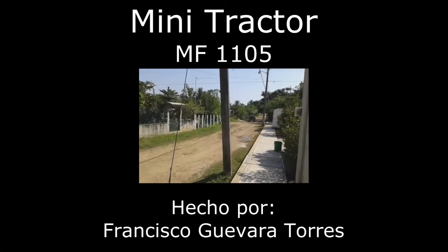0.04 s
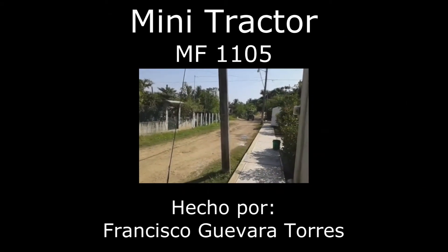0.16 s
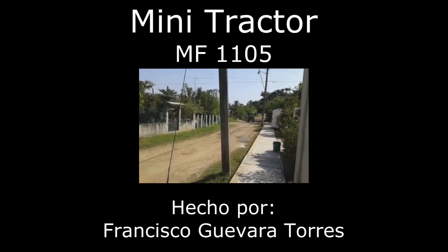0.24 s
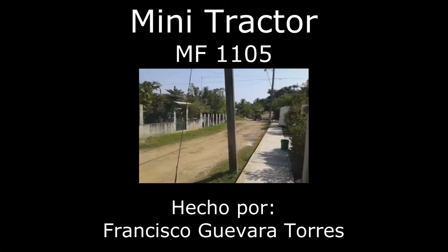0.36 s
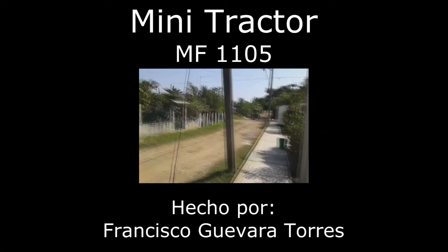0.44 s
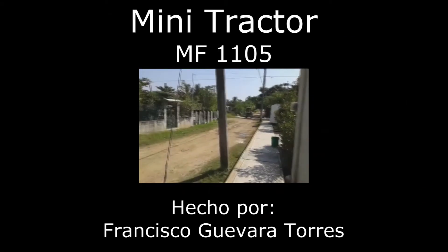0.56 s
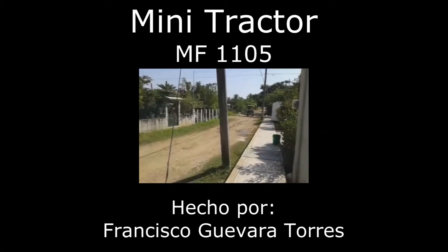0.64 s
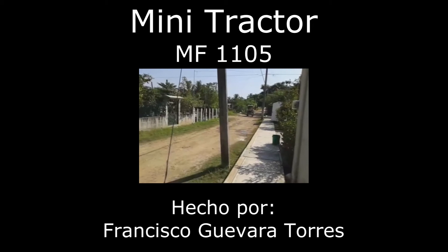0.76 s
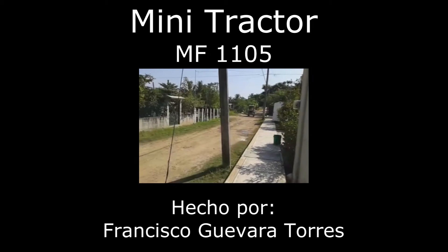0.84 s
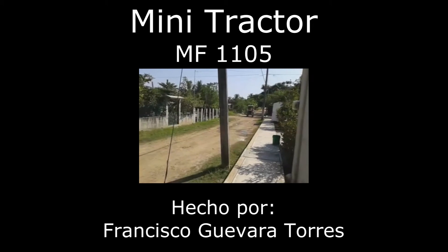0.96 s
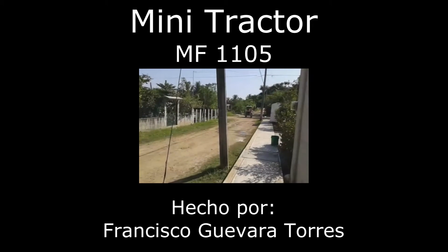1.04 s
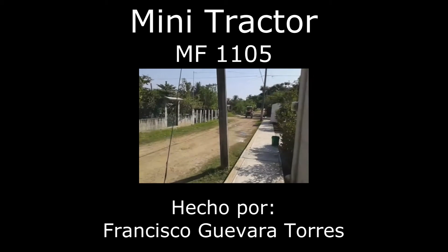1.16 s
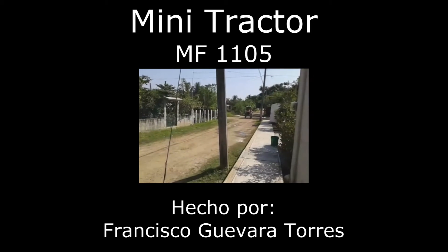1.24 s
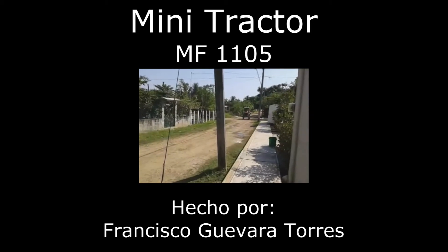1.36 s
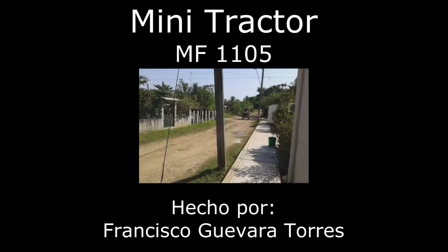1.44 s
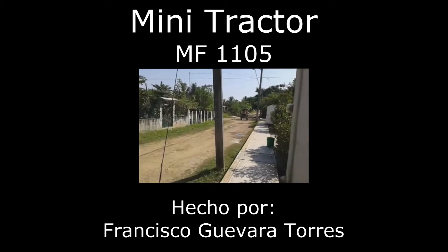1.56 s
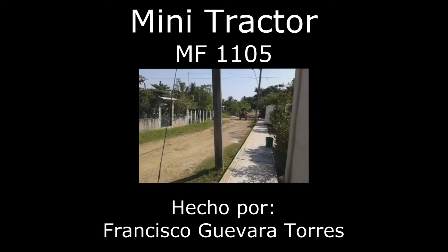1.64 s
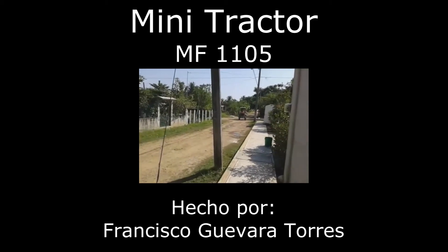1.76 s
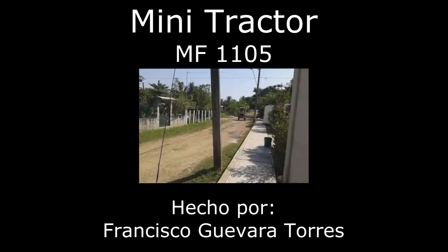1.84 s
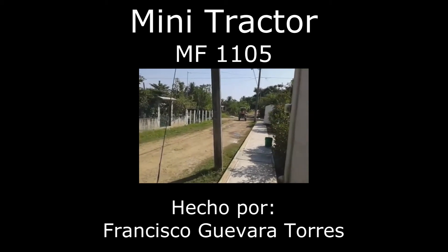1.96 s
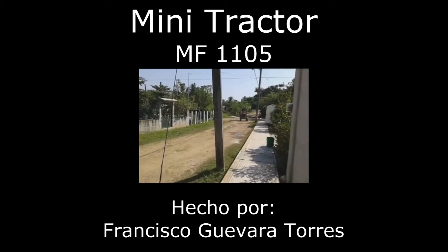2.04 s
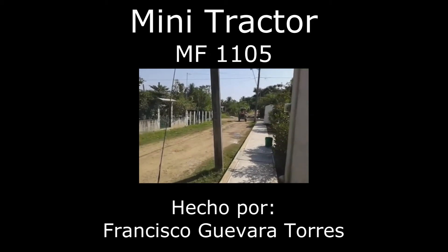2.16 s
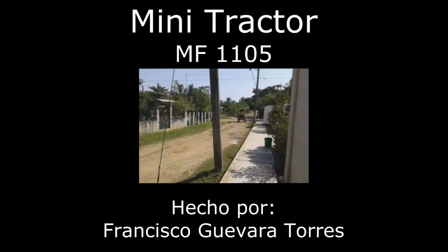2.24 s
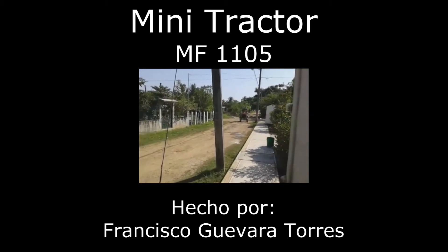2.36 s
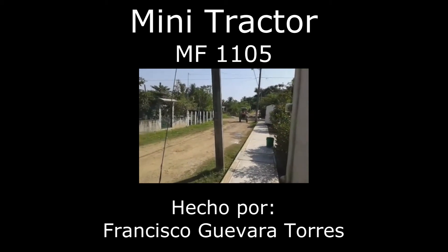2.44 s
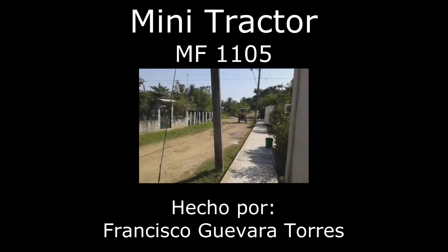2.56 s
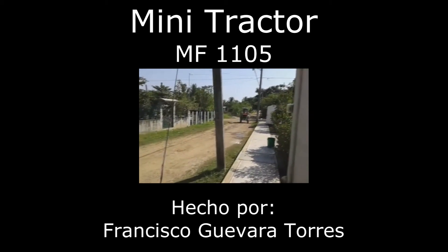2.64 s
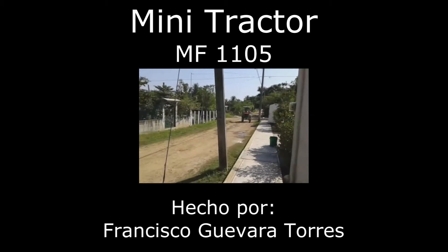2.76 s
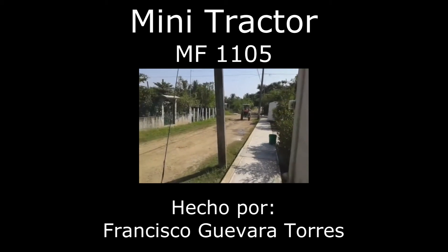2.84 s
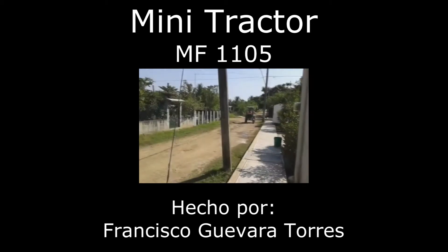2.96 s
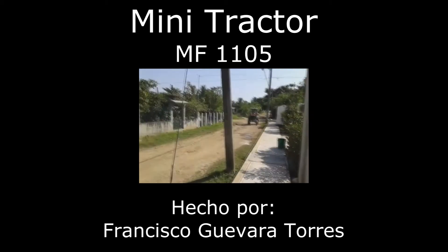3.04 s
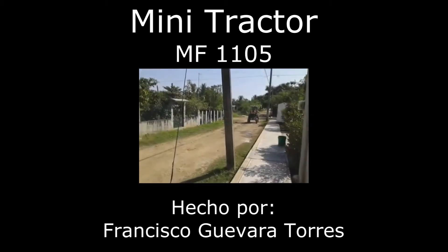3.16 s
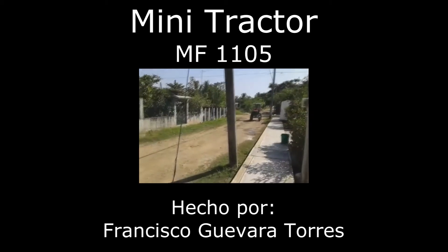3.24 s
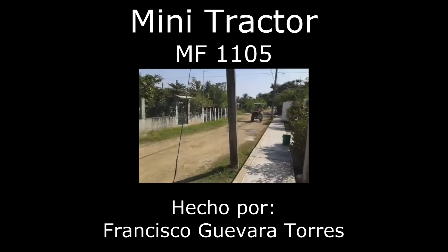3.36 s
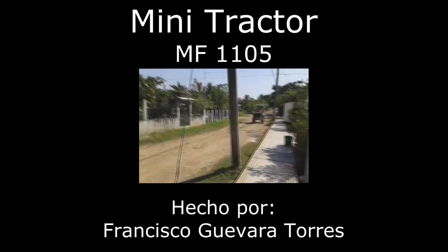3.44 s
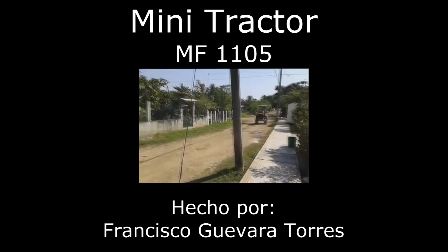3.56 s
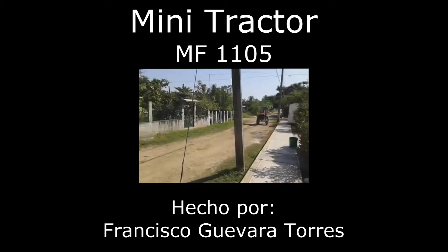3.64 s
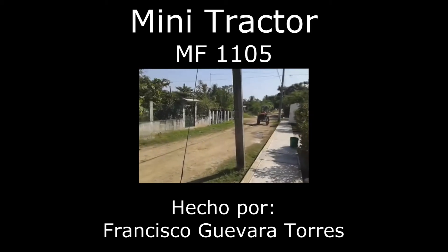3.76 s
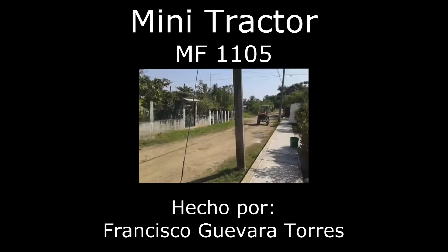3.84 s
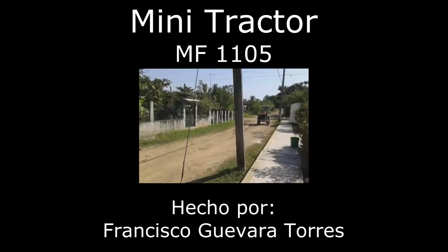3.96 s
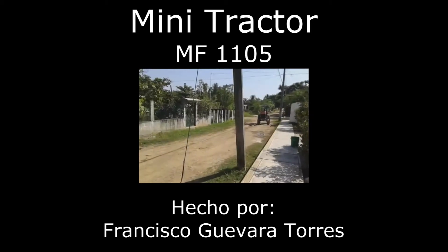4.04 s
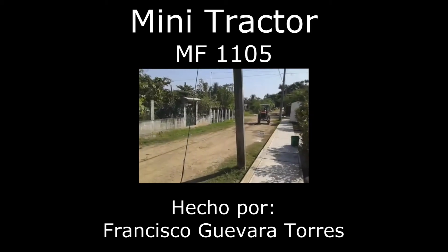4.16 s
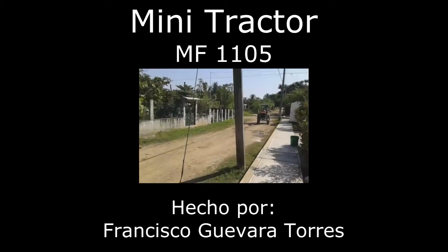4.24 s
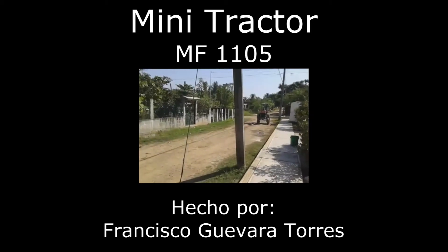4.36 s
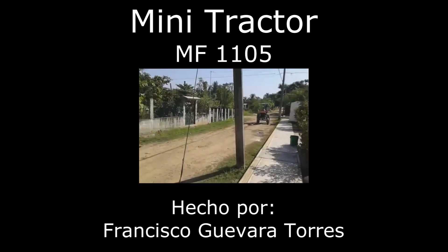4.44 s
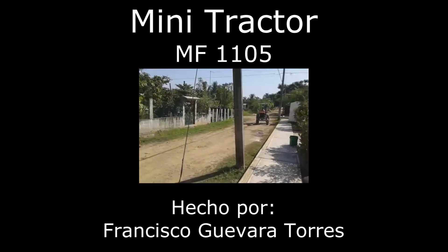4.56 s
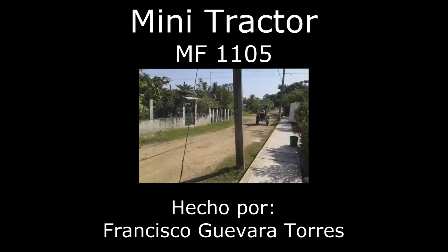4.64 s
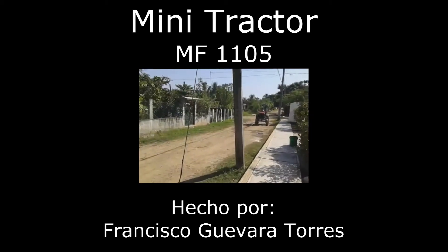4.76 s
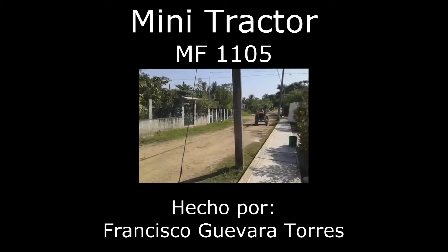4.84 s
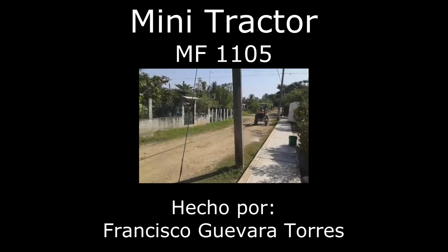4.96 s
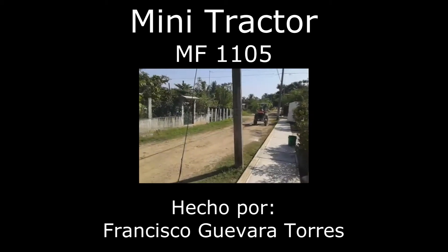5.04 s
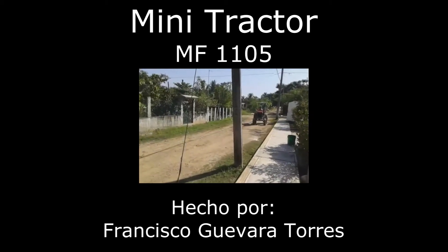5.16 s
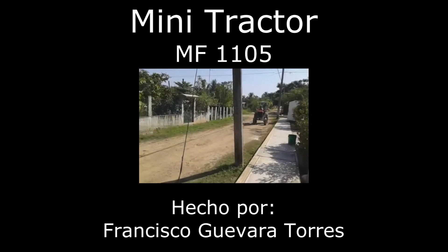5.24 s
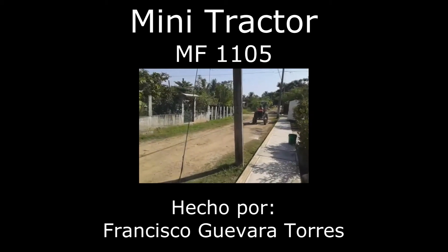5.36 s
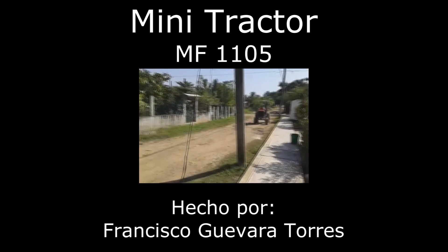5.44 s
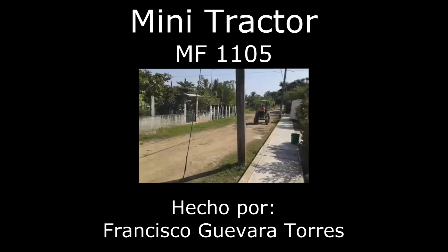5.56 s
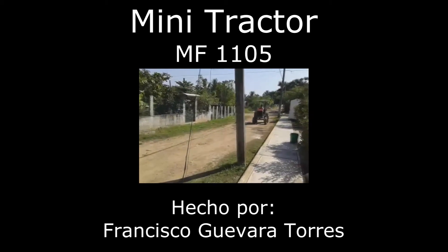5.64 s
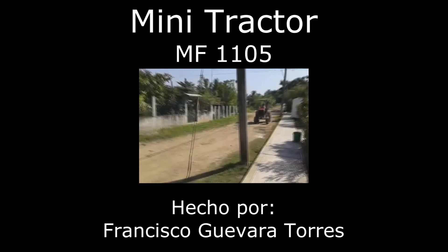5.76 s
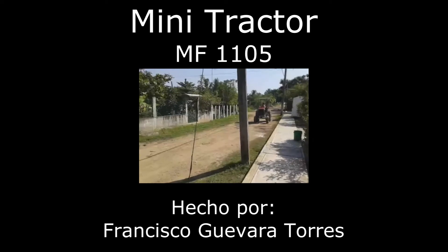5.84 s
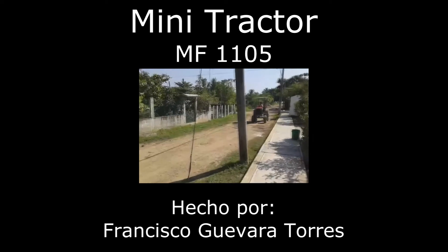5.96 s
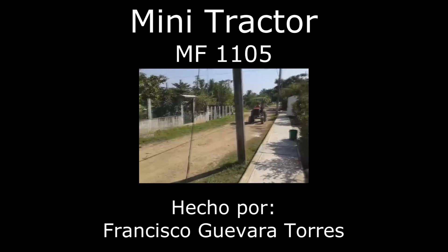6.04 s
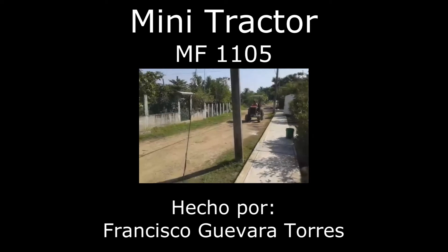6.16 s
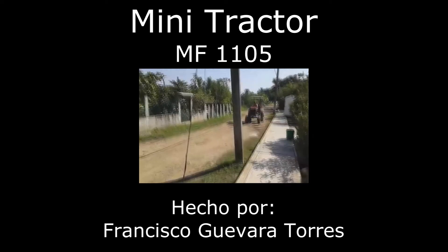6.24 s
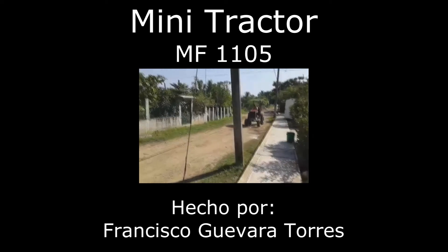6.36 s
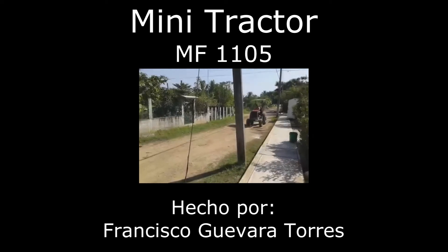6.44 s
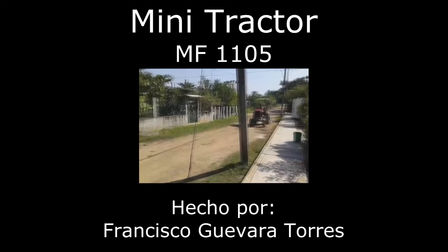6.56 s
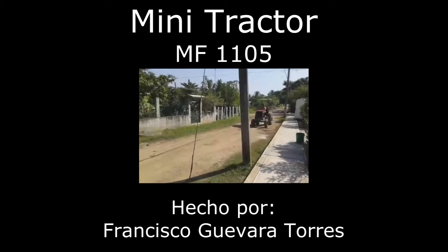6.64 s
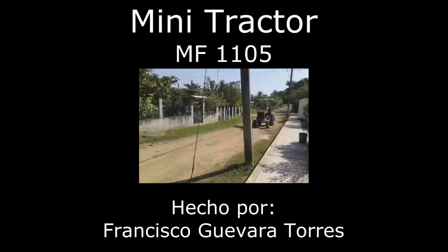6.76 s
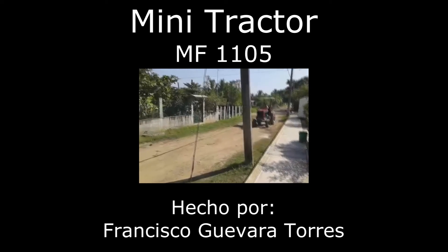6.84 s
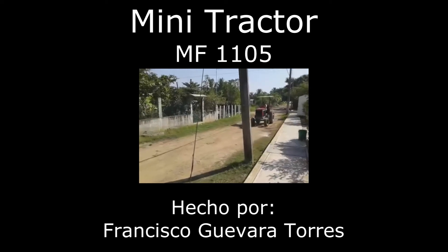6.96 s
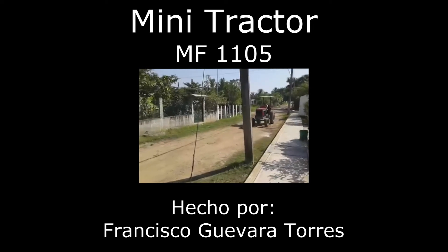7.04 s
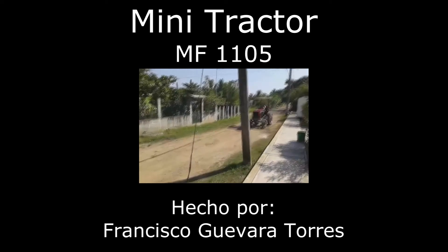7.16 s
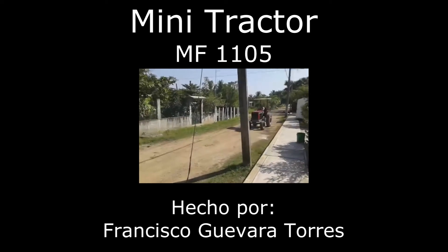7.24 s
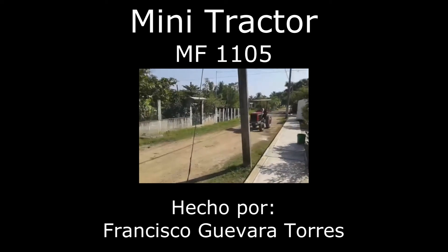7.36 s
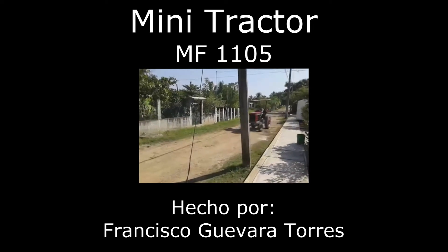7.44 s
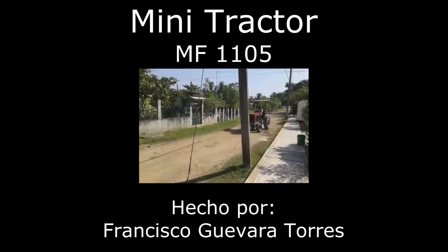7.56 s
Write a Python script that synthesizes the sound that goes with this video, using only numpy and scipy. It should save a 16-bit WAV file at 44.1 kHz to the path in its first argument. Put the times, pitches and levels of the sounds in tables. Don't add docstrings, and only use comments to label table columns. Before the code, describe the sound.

A small tractor's petrol engine throbs unevenly up a dirt street, distant, then abruptly closer and louder, with metal clanking and hissing valves.

```python
import sys
import numpy as np
from scipy import signal
from scipy.fft import rfft, irfft, next_fast_len
from scipy.io import wavfile
from scipy.ndimage import uniform_filter1d

SR = 44100
rng = np.random.default_rng(int(sys.argv[2]) if len(sys.argv) > 2 else 0)


def gain_from_db(level_db):
    decades = np.asarray(level_db, float) / 20
    return 10 ** decades


def wav_record(signal):
    frames = np.transpose(np.atleast_2d(signal))
    bounded = np.clip(frames, -1, 1)
    quanta = np.round(bounded * 32767).astype(np.int16)
    wavfile.write(sys.argv[1], SR, quanta)


N = 335160
CUT_S = 3.398
PIPE_LAG = -0.75

# time in seconds, level in dB.
WIND = [
    (0.0, -68),
    (3.96, -77),
    (4.06, -75),
    (7.34, -60),
    (7.6, -47),
]
# time in seconds, level in dB.
NEARNESS = [(0.0, -54), (0.43, -52), (1.45, -52), (3.04, -48), (3.39, -48), (3.41, -45.5), (3.67, -43),
            (4.06, -41.5), (4.77, -43), (6.3, -39.5), (6.79, -40), (7.2, -38.5), (7.6, -39)]
# frequency in Hz, level in dB per Hz.
FAR_RUMBLE = [(160, -3), (280, 3), (318, -2.5), (351, -8), (383, -5.5), (414, -9.5), (600, -2.5),
              (662, -6.5), (709, -2.5), (829, -1), (1040, -18.5), (1200, -9.5), (1540, -19.5), (2000, -16),
              (2900, -34.5), (3770, -48), (6380, -120)]
NEAR_RUMBLE = [(160, -10.5), (280, 0), (334, -6), (383, -9), (414, -17), (461, -12), (504, -10.5),
               (682, -11.5), (745, -7.5), (1030, -21), (1200, -15), (1340, -21.5), (1870, -18),
               (2230, -24.5), (2900, -36), (3770, -57), (6380, -120)]
# frequency in Hz, level in dB per Hz.
FAR_HISS = [(1470, -44), (2500, -12.5), (3130, -11.5), (3440, -4), (3730, -5.5), (3980, 1.5), (4680, -6),
            (5290, -0.5), (5690, -4), (7560, -19), (9620, -25), (13300, -27.5), (14200, -36)]
NEAR_HISS = [(1470, -32), (2500, -11), (3110, -9), (4220, 0.5), (4640, -1.5), (5330, 1.5), (5820, -1.5),
             (7190, -16.5), (8370, -20.5), (13300, -27), (14200, -31)]
# far level in dB, near level in dB.
HISS_DB = [-5, -2.6]
# time in seconds, lower resonance in Hz, upper resonance in Hz, strength in dB.
PANELS = [
    (3.4, 4100, 5600, -1),
    (3.52, 4080, 5280, 8.5),
    (4.09, 4270, 5640, 6),
    (4.76, 3760, 5460, 1.5),
    (7.6, 4740, 5430, 3.5),
]
# time in seconds, peak in dB, treble against the peak in dB, ring time to -60 dB in seconds.
CLANKS = [(0.0294, -37.5, -24, 0.16), (0.1344, -38.5, -24, 0.15), (0.3544, -38.5, -22, 0.084),
          (0.475, -41, -23, 0.22), (1.05, -31, -28, 0.077), (1.1667, -30, -26, 0.058),
          (1.2605, -32, -24, 0.093), (1.3379, -34.5, -26, 0.078), (1.7315, -40, -27, 0.16),
          (2.3411, -42, -19, 0.18), (2.4244, -41.5, -23, 0.28), (2.6394, -38.5, -24, 0.25),
          (3.3398, -36, -31, 0.12), (3.6894, -29, -24, 0.069), (4.1294, -32, -22, 0.21),
          (4.67, -25.5, -26, 0.086), (4.8344, -25, -31, 0.071), (5.2494, -31, -23, 0.1),
          (2.7694, -43, -26, 0.18), (5.731, -26.5, -27, 0.28), (5.844, -22, -21.5, 0.16),
          (6.1599, -29.5, -32, 0.9), (6.3094, -24, -23, 0.19), (6.7715, -28.5, -21, 0.26),
          (6.9765, -24, -21, 0.14), (7.0609, -20.5, -23.5, 0.064), (7.0968, -26.5, -15, 0.44),
          (7.212, -27.5, -19, 0.5), (7.3344, -25, -27, 0.11), (7.5233, -21.5, -15.5, 0.18)]
# frequency in Hz, level in dB.
CLANK_BODY = [(900, -11), (1500, -9), (2600, -15), (4000, -1), (5400, 5), (6600, -7), (8000, -19)]
# time in seconds, peak in dB, ring in Hz.
KNOCKS = [(3.515, -41, 835), (3.615, -38, 750), (3.8, -36.5, 800), (3.928, -38.5, 577), (4.195, -38, 742),
          (4.291, -31, 735), (4.449, -41, 586), (4.633, -42, 800), (5.453, -44, 543), (5.635, -44, 854),
          (5.741, -37, 835), (5.802, -36, 600), (5.96, -41, 603), (6.067, -42, 730), (6.16, -38, 780),
          (6.253, -34, 800), (6.34, -34, 794), (7.224, -44, 730), (7.397, -41, 594), (7.484, -47, 520)]
# start in seconds, end in seconds, pitch in Hz, level in dB, fade in dB per cycle.
DRONES = [
    (2.6, 2.98, 383, -50, 3),
    (3.75, 3.98, 383, -46, 5),
    (3.95, 4.48, 470, -39, 26),
    (6.38, 7.06, 462, -38, 24),
    (7.38, 7.7, 465, -34, 24),
    (3.55, 4.6, 730, -48, 12),
    (6.45, 7.1, 745, -48, 8),
    (3.9, 4.7, 1200, -55, 24),
    (7.15, 7.5, 1230, -46, 22),
]
# time in seconds, firings per second.
SPEED = [(0.04, 32.0), (0.39, 49.0), (1.02, 32.6), (1.32, 38.4), (1.82, 35.8), (2.0, 40.0), (2.56, 39.4),
         (2.72, 46.6), (3.17, 45.6), (3.37, 35.8), (3.78, 45.0), (4.36, 51.2), (4.73, 41.2), (5.9, 36.0),
         (6.46, 49.2), (6.84, 50.9), (7.2, 44.2), (7.6, 51.0)]
# time in seconds, level in dB.
LOAD = [(0.0, -48), (0.25, -36.5), (0.45, -42), (0.85, -36), (1.05, -41.5), (1.4, -33.5), (1.65, -36.5),
        (2.0, -34), (2.58, -33), (2.75, -39.5), (3.12, -36.5), (3.3, -31.5), (3.55, -28), (4.3, -30),
        (5.4, -25), (6.3, -29.5), (6.68, -29.5), (7.6, -27.5)]
# frequency in Hz, level in dB per Hz.
PIPE = [(18, -65), (30, -68), (49, -36.5), (62, -44), (80, -18), (108, -13), (135, -2.5), (165, 1),
        (200, -2), (235, -4.5), (265, -15.5), (300, -30), (380, -36.5), (430, -39.5), (550, -68)]
# far level in dB, near level in dB.
SCATTER_DB = [-13., -18.]
# far level in dB, near level in dB.
BOOM_DB = [
    (-20.5, -30.5),
    (-14.5, -17),
    (-16, -8.5),
]
# harmonic number, start in seconds, end in seconds, level in dB.
SINGING = [(3, 0.4, 0.21, -44), (4, 0.3, .25, -45.5), (2, 0.5, 0.27, -49), (2, 2.5, 2.7, -48),
           (3, .32, 0.56, -35), (3, 1.2, 1.03, -41), (4, 0.76, 0.9, -36.5), (4, 1.2, 1.52, -37),
           (3, 1.2, 1.32, -39), (3, 1.6, 1.95, -40.5), (4, 1.81, 2.36, -38), (4, 2.58, 2.72, -36),
           (3, 2.5, 3.17, -32), (2, 2.95, 3.3, -48), (4, 3.42, 3.82, -33), (3, 3.5, 3.97, -28),
           (2, 3.55, 3.95, -43), (3, 4.14, 4.22, -29.5), (2, 4.25, 4.37, -37.5), (4, 4.05, 4.53, -30),
           (3, 4.5, 5.2, -34), (4, 5, 5.8, -26.5), (4, 5.9, 6.25, -26), (2, 6, 6.6, -39.5),
           (3, 6.28, 6.45, -27.5), (3, 6.55, 6.97, -21), (4, 6.82, 6.97, -32), (2, 6.95, 7.45, -42.5),
           (3, 7.05, 7.3, -24.5), (4, 7.26, 7.34, -29), (3, 7.42, 7.7, -19.5)]
# time in seconds, depth from 0 to 1.
THROB = [
    (0.0, 0.0),
    (6.95, 0.0),
    (7.03, .6),
    (7.36, .6),
    (7.46, .1),
    (7.6, .1),
]


def rms_one(x):
    return x / np.sqrt(np.mean(x ** 2) + 1e-20)


def in_time(rows):
    s, *columns = np.transpose(rows)
    return [np.interp(np.arange(N) / SR, s, column) for column in columns]


def at_hz(points, hz):
    point_hz, point_db = np.array(points).T
    return np.interp(np.log(hz), np.log(point_hz), point_db, left=-90, right=-90)


def coloured(x, points):
    size = next_fast_len(N)
    hz = np.arange(size // 2 + 1) * SR / size + 1e-3
    spectrum = rfft(x, size) * gain_from_db(at_hz(points, hz))
    return rms_one(irfft(spectrum, size)[:N])


def drift(rate_hz, size=1):
    r = np.exp(-80 * np.pi * rate_hz / SR)
    slow = signal.lfilter([1], [1, -2 * r, r * r], rng.standard_normal(N // 40 + 2002))[2000:]
    return np.interp(np.arange(0, N, size) / 40, np.arange(len(slow)), rms_one(slow))


def far_near(far, near):
    return np.where(np.arange(N) < CUT_S * SR, far, near)


def patches(shape, size):
    field = rng.standard_normal(shape)
    for _ in range(2):
        field = uniform_filter1d(field, size=size[0], axis=0)
        field = uniform_filter1d(field, size=size[1], axis=1)
    return rms_one(field)


def wind():
    air = coloured(rng.standard_normal(N), [(12, -2), (30, -9), (60, 6), (90, -24)])
    return gain_from_db(in_time(WIND)[0] + 1.5 * drift(3.0)) * air


def street_echoes(x):
    hz, s, cells = signal.stft(x, SR, nperseg=1024)
    times, low_hz, high_hz, panel_db = np.transpose(PANELS)
    db = 0.77 * patches(cells.shape, size=(3, 10)) + 2.19 * patches(cells.shape, size=(1, 5))
    strength_db = np.interp(s, times, panel_db, left=0)
    for panel_hz in (low_hz, high_hz):
        centre_hz = np.interp(s, times, panel_hz)
        db += strength_db * np.exp(-((hz[:, None] - centre_hz) / 59.0) ** 2)
    return signal.istft(cells * gain_from_db(db), SR, nperseg=1024)[1][:N]


def rattles(firings, near_db):
    starts = np.flatnonzero(np.diff(np.floor(firings / 4)))
    rows = []
    for i, (late, luck) in zip(starts, rng.standard_normal((len(starts), 2))):
        rows.append((i / SR + 0.0197 * late, near_db[i] + 5 + 2.5 * luck, -23, 0.12))
    return rows


def clanks(rows):
    body, treble = np.zeros(N), np.zeros(N)
    t = np.arange(int(0.2 * SR)) / SR
    for s, db, treble_db, t60 in rows:
        shape = (1 - np.exp(-t / 0.0055)) * gain_from_db(db - 9.5 - 60 * t / max(t60, 0.02))
        i = int(np.clip((s - 0.004) * SR, 0, N - 1))
        body[i:i + len(t)] += shape[:N - i]
        bright_shape = shape * np.exp(-t / 0.048)
        treble[i:i + len(t)] += gain_from_db(treble_db + 9.0) * bright_shape[:N - i]
    dull = coloured(rng.standard_normal(N), CLANK_BODY)
    bright = coloured(rng.standard_normal(N), [(6500, 2.5), (8000, 3), (11000, -2.5), (14500, -10)])
    return body * dull + treble * bright


def knocks():
    out, t = np.zeros(N), np.arange(int(0.15 * SR)) / SR
    for s, db, hz in KNOCKS:
        envelope = gain_from_db(db + 1.0 - 60 * t / 0.1) * (1 - np.exp(-t / 0.0052))
        ring = envelope * np.sin(2 * np.pi * hz * t)
        i = int(s * SR)
        out[i:i + len(t)] += ring[:N - i]
    return out


def drones(firings):
    t, out, cycle = np.arange(N) / SR, np.zeros(N), firings / 4
    for start, end, hz, db, fade_db in DRONES:
        swell = np.clip(np.minimum(t - start, end - t) / 0.08, 0, 1)
        since_blow = (cycle + rng.random()) % 1
        blows = uniform_filter1d(gain_from_db(-fade_db * since_blow), size=300)
        wander = np.cumsum(fade_db * drift(12.0)) / SR
        tone = np.sin(2 * np.pi * (hz * t + wander))
        out += gain_from_db(db + 1.04 * drift(10.0)) * swell * blows * tone
    return out


def gear(firings, far, near, level_db, beat, flicker_db):
    throb = 1 + np.clip(beat, 0, 1) * np.cos(np.pi / 2 * firings)
    white = rng.standard_normal(N) * throb
    return gain_from_db(level_db + flicker_db) * far_near(coloured(white, far), coloured(white, near))


def running_gear(firings):
    near_db, = in_time(NEARNESS)
    shake = drift(8.9)
    rumble = gear(firings, FAR_RUMBLE, NEAR_RUMBLE, near_db, 0.14, 0.25 * shake)
    rumble *= 1 + 0.08 * np.cos(2 * np.pi * firings)
    flicker_db = 0.81 * shake + 0.5 * drift(43.0)
    hiss = gear(firings, FAR_HISS, NEAR_HISS, near_db + far_near(*HISS_DB), 0.02, flicker_db)
    metal = clanks([*CLANKS, *rattles(firings, near_db)])
    return gain_from_db(-2.0) * street_echoes(rumble + hiss + metal) + knocks() + drones(firings)


def singing_db(harmonic, rest_db):
    t, db = np.arange(N) / SR, rest_db
    for k, start, end, top_db in SINGING:
        if k == harmonic:
            outside_s = np.minimum(0, np.minimum(t - start, end - t))
            db = np.maximum(db, top_db + 100 * outside_s)
    return db + 1.5 * drift(5.4)


def firing_lines(rate, firings):
    slow = 16
    first_db, uneven_db = 9, (3.5, -4, -2.5, -4)
    lines = 0
    for quarter in range(4, 41):
        if quarter in (8, 12, 16):
            continue
        multiple = quarter / 4
        line_db = first_db if quarter == 4 else uneven_db[quarter % 4]
        db = at_hz(PIPE, rate[::slow] * multiple) + line_db + 3.0 * drift(1.57, size=slow)
        sign = -1 if multiple % 1 == 0.75 else 1
        lag = PIPE_LAG * np.ceil(multiple - 0.5) ** 2 + 0.35 * drift(1.5, size=slow)
        lines = lines + sign * gain_from_db(db) * np.cos(2 * np.pi * multiple * firings[::slow] - lag)
    return signal.resample_poly(lines, slow, 1)[:N]


def boom(firings, body_db):
    out = 0
    for k, db in zip(range(2, 5), BOOM_DB):
        tone = np.cos(2 * np.pi * k * firings - PIPE_LAG * k ** 2)
        out = out + gain_from_db(singing_db(k, body_db + far_near(*db))) * tone
    return np.sqrt(2) * out * (1 - in_time(THROB)[0] * np.cos(np.pi / 2 * firings))


def exhaust(rate, firings):
    body_db, = in_time(LOAD)
    bangs = np.diff(np.floor(firings), prepend=0) * rng.standard_normal(N)
    scatter = coloured(bangs + 0.13 * rng.standard_normal(N), PIPE)
    body = rms_one(firing_lines(rate, firings)) + gain_from_db(far_near(*SCATTER_DB)) * scatter
    band = signal.sosfilt(signal.butter(2, [160, 290], "band", fs=SR, output="sos"), body)
    body /= np.sqrt(uniform_filter1d(band ** 2, size=SR // 3) + 1e-9)
    return gain_from_db(body_db - 1.0) * body + boom(firings, body_db)


def scene():
    flywheel_s = 0.12
    rate = uniform_filter1d(in_time(SPEED)[0], size=int(flywheel_s * SR), mode="nearest")
    firings = np.cumsum(rate) / SR
    street = wind() + running_gear(firings) + exhaust(rate, firings)
    fade = np.clip(abs(np.arange(N) / SR - CUT_S) / 0.004, 0, 1)
    return (street * np.sin(np.pi / 2 * fade) ** 2)[None]


def low_pass(x):
    return signal.sosfilt(signal.butter(12, 14400, fs=SR, output="sos"), x)


def record(dry):
    hz, s, cells = signal.stft(dry[0], SR, nperseg=1024)
    starved = np.clip((hz[:, None] - 6000) / 3000, 0, 1) * (s > CUT_S)
    dropped = patches(cells.shape, size=(5, 2)) > 4 - 3.1 * starved
    gain = np.where(dropped, gain_from_db(-22), 1) * (hz[:, None] < 14000)
    kept = signal.istft(cells * gain, SR, nperseg=1024)[1][:N]
    return low_pass(kept[None])


dry = scene()
out = record(dry)
wav_record(out)
```